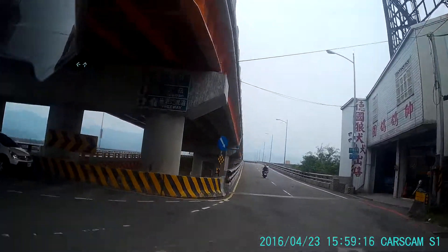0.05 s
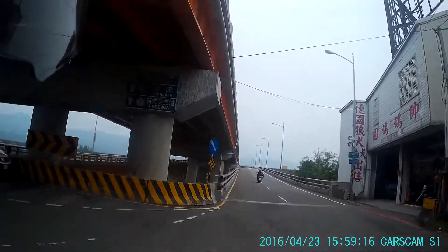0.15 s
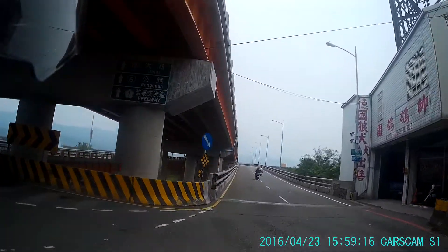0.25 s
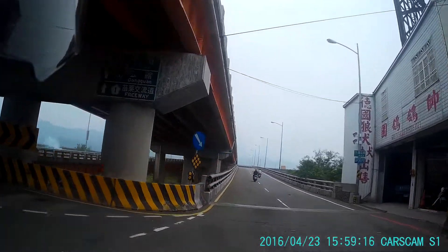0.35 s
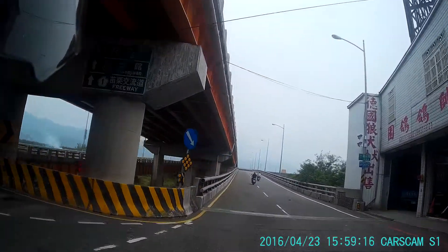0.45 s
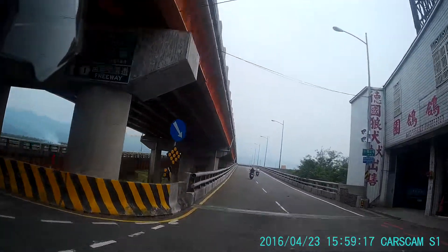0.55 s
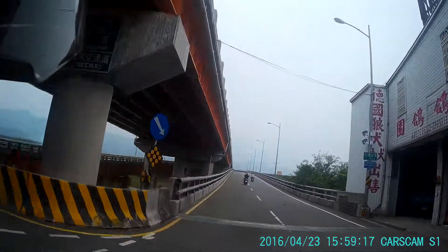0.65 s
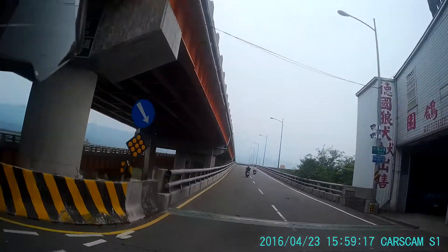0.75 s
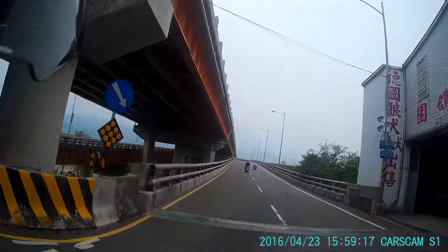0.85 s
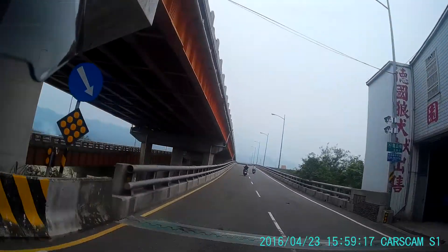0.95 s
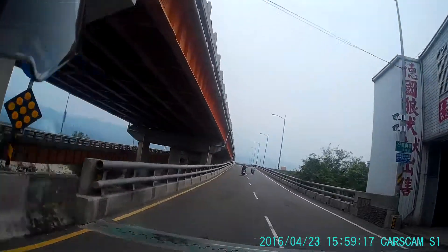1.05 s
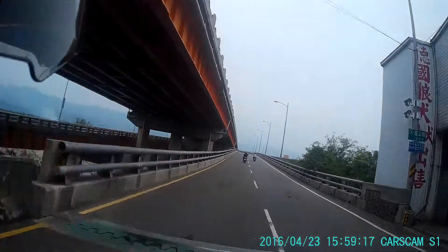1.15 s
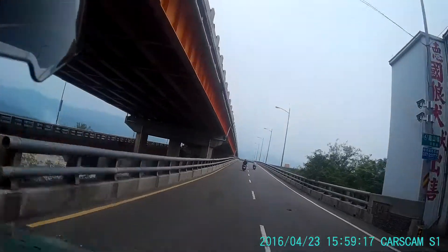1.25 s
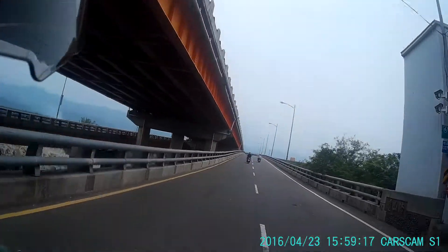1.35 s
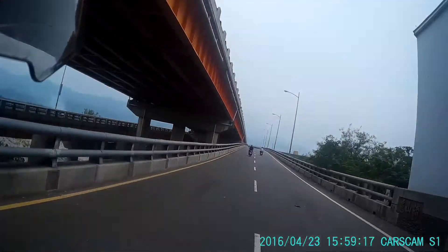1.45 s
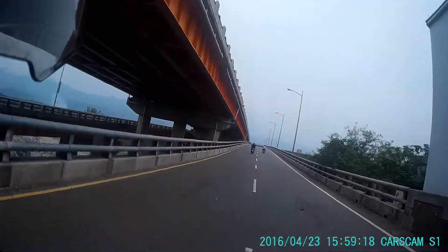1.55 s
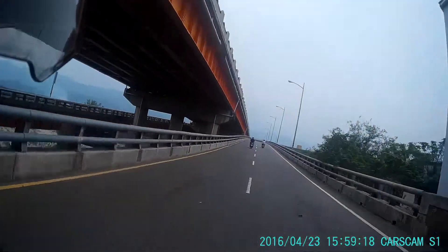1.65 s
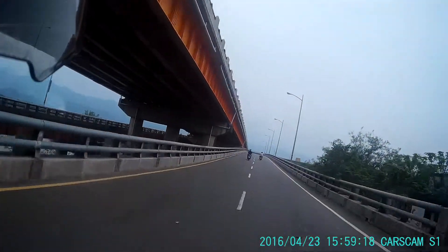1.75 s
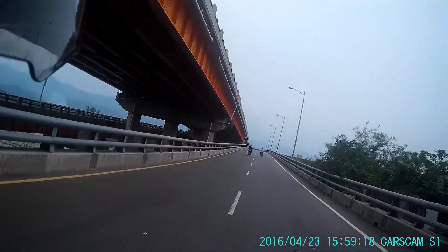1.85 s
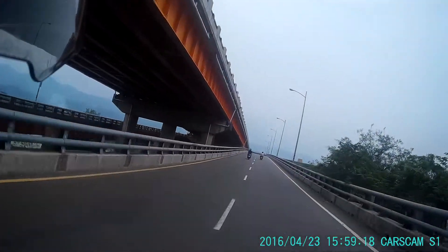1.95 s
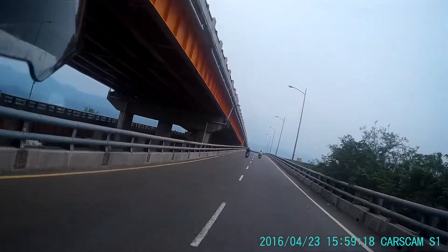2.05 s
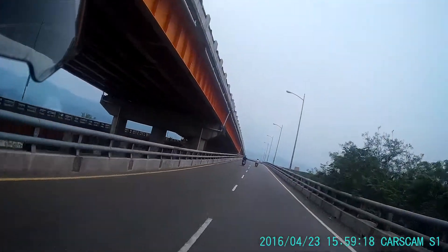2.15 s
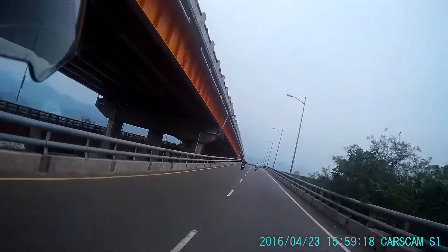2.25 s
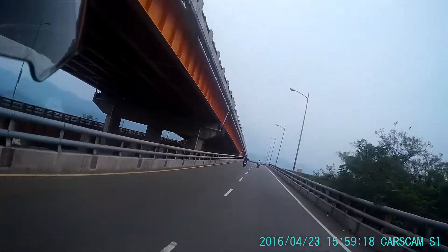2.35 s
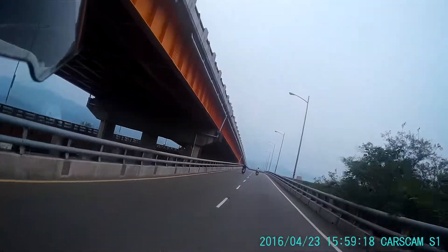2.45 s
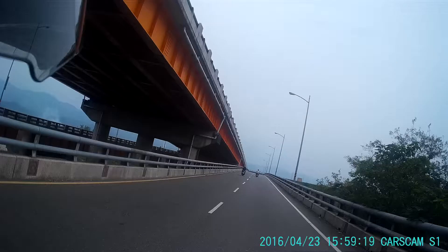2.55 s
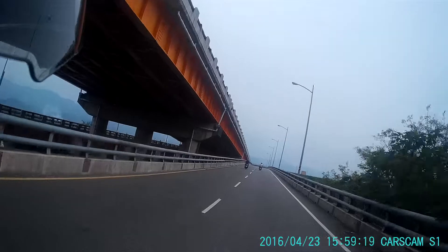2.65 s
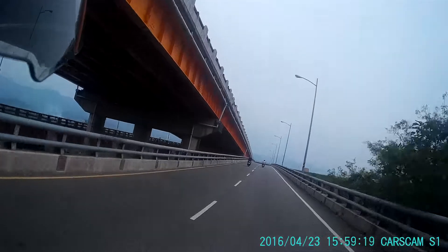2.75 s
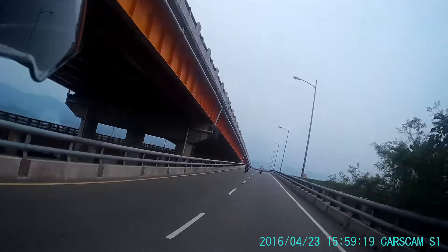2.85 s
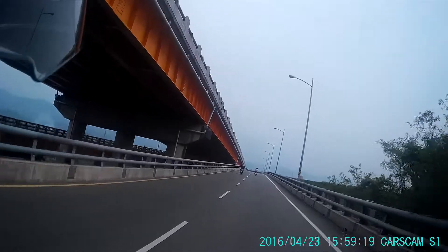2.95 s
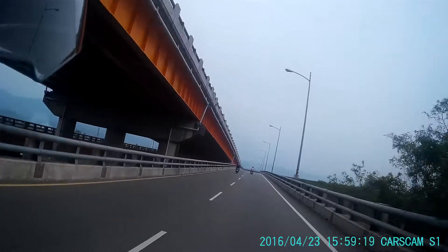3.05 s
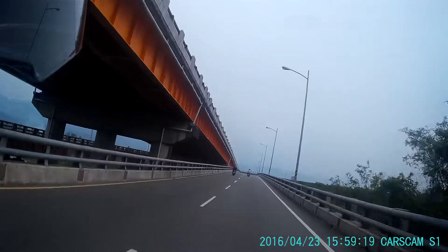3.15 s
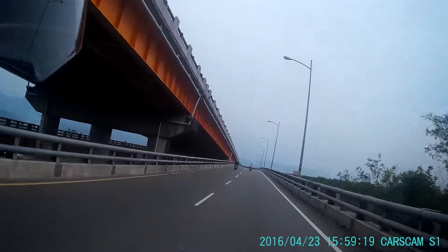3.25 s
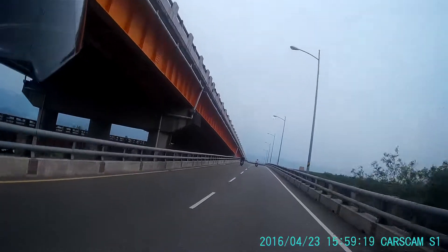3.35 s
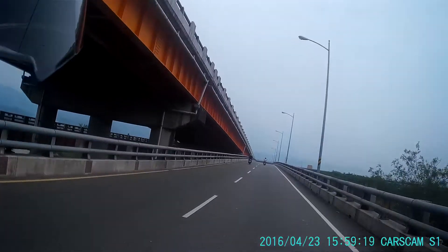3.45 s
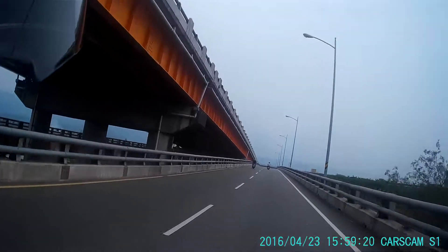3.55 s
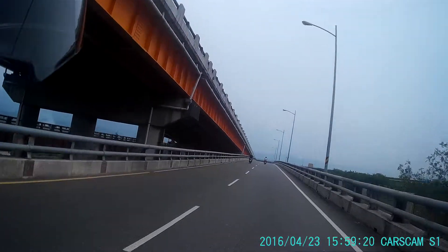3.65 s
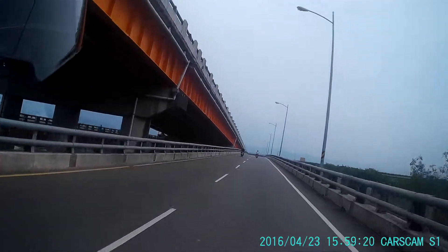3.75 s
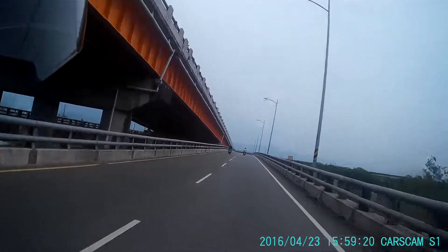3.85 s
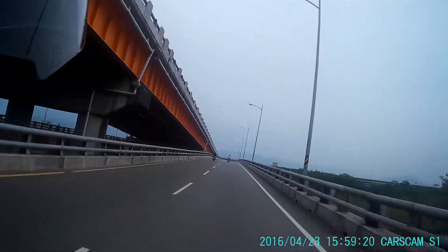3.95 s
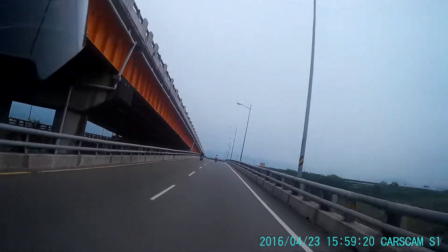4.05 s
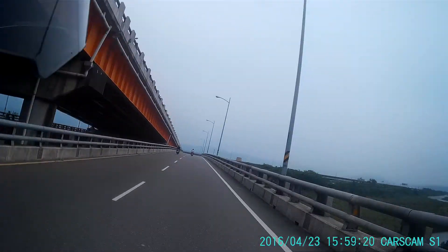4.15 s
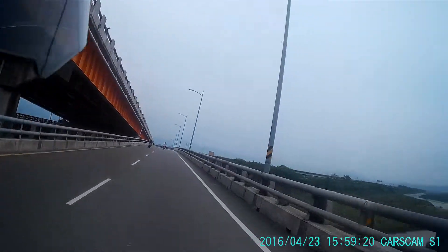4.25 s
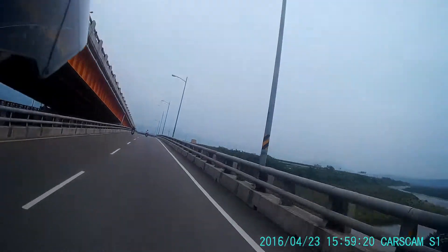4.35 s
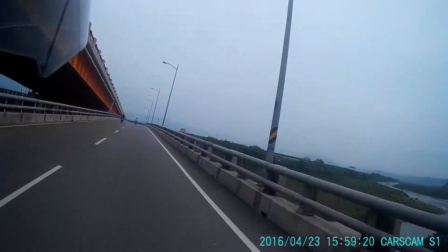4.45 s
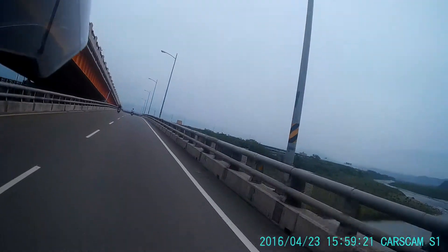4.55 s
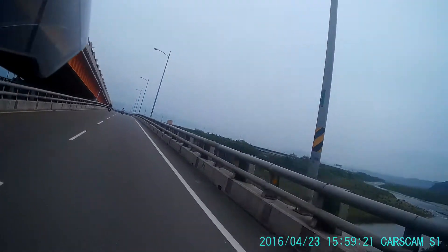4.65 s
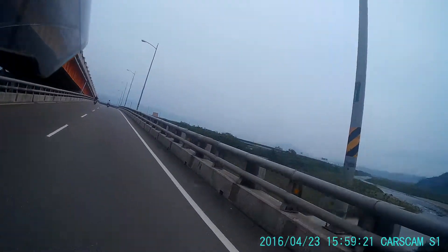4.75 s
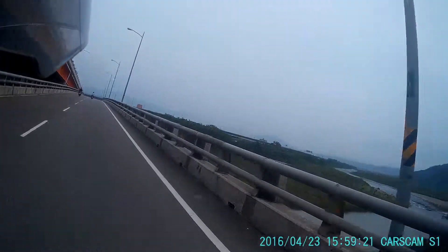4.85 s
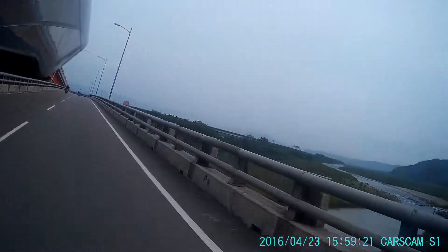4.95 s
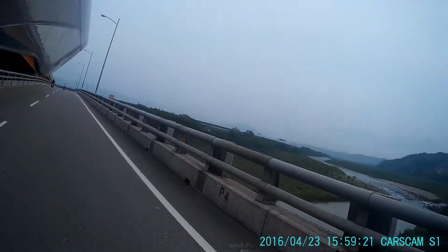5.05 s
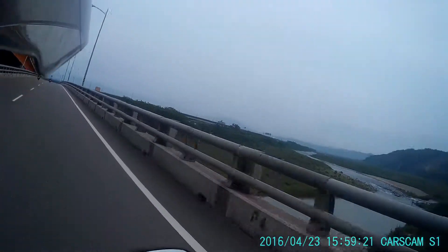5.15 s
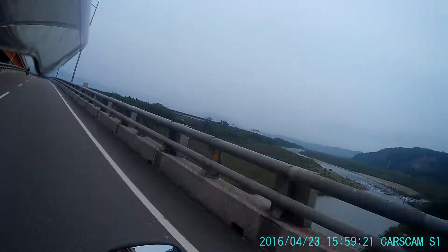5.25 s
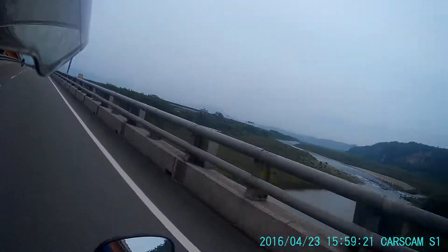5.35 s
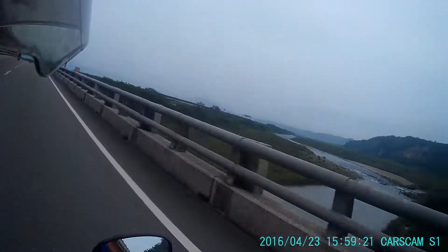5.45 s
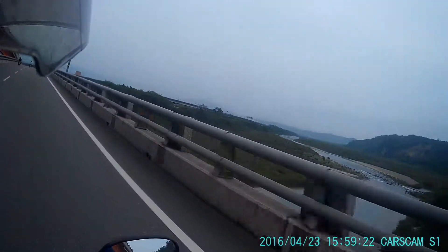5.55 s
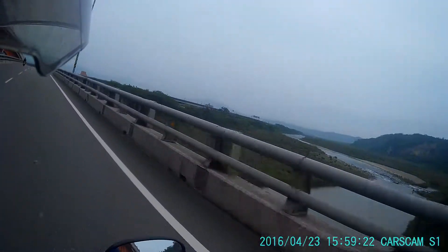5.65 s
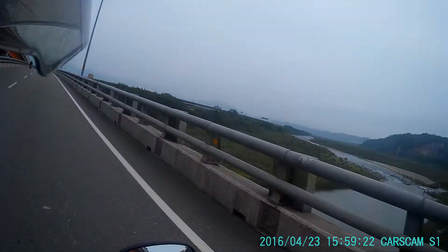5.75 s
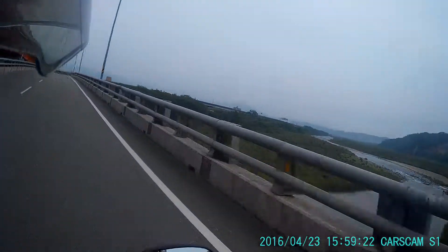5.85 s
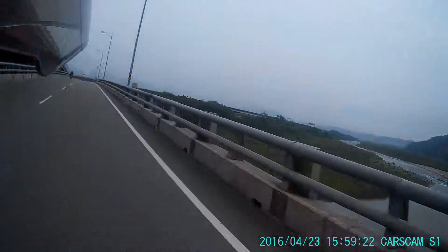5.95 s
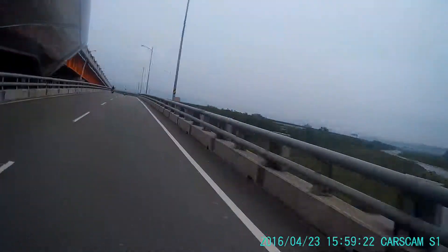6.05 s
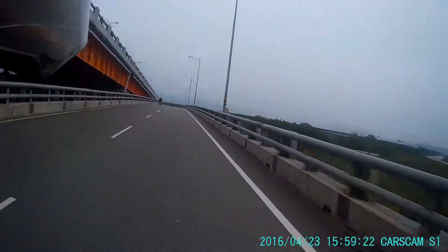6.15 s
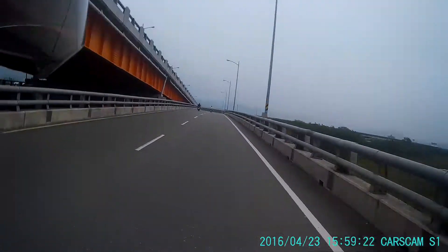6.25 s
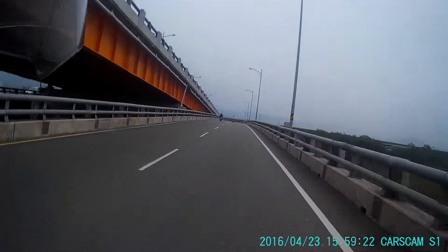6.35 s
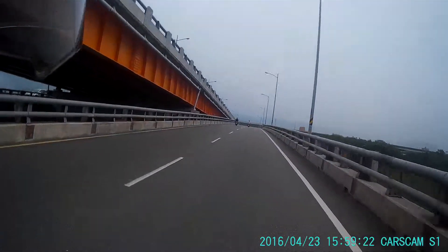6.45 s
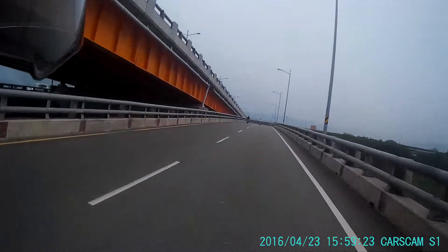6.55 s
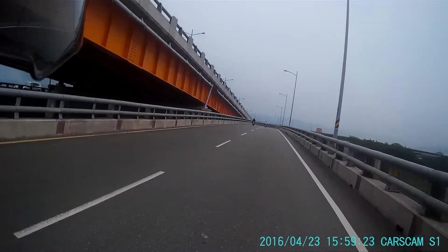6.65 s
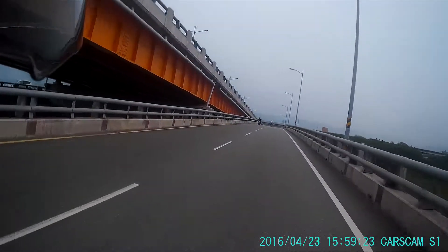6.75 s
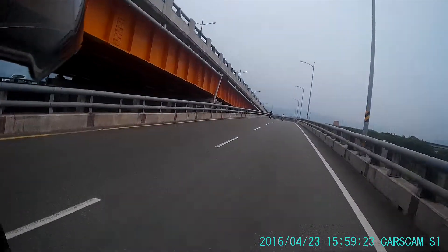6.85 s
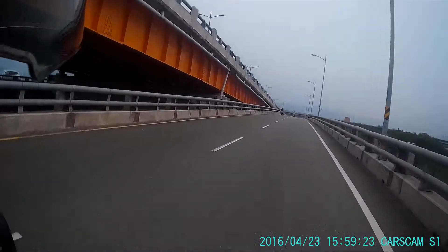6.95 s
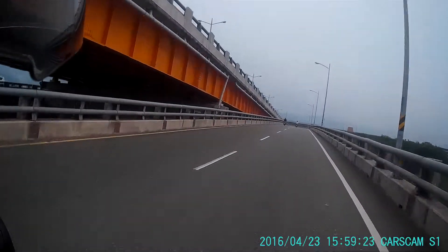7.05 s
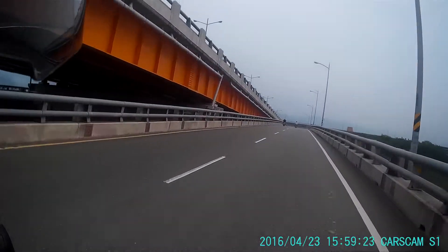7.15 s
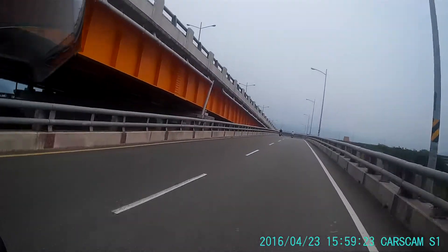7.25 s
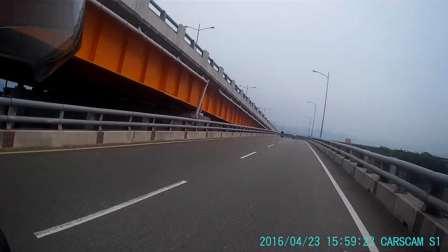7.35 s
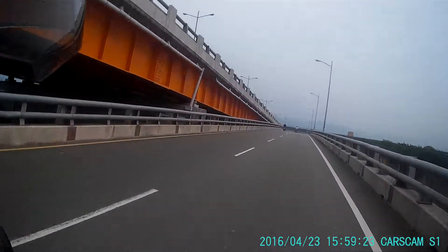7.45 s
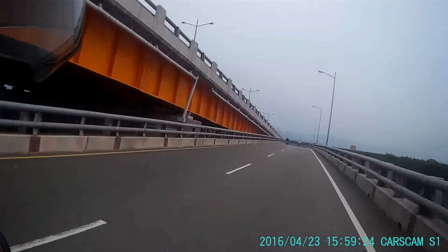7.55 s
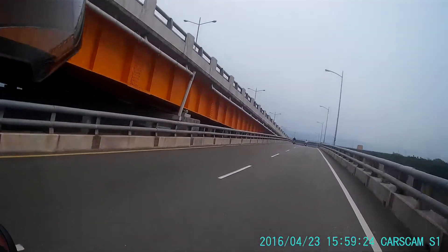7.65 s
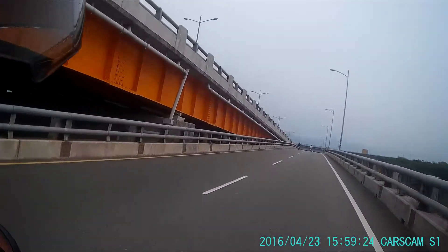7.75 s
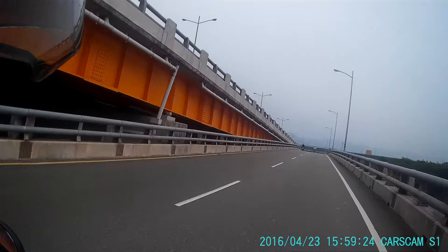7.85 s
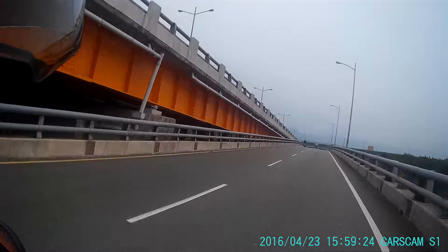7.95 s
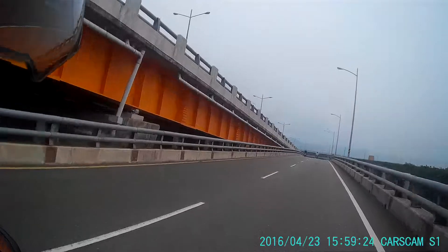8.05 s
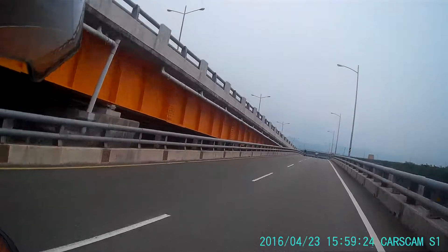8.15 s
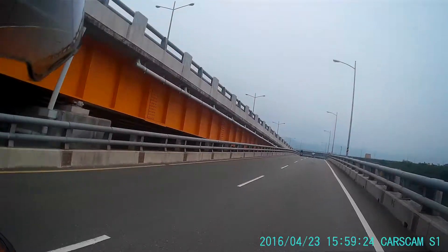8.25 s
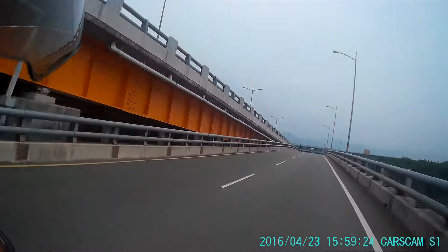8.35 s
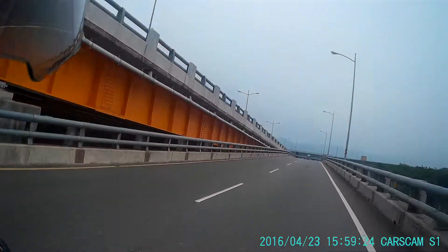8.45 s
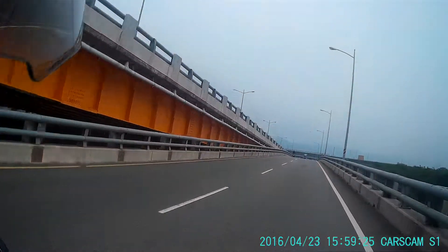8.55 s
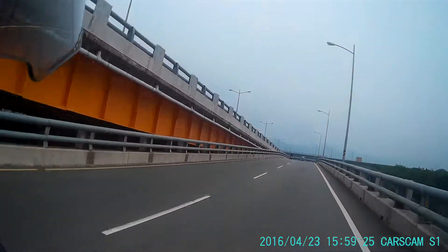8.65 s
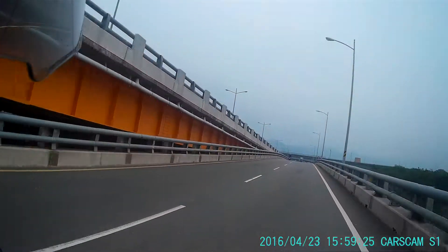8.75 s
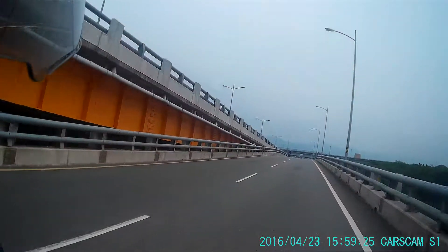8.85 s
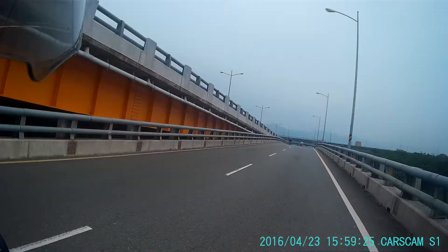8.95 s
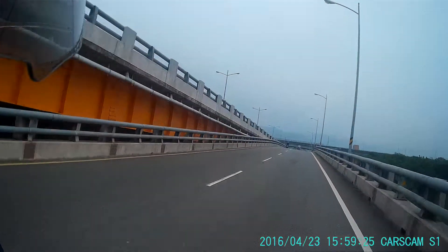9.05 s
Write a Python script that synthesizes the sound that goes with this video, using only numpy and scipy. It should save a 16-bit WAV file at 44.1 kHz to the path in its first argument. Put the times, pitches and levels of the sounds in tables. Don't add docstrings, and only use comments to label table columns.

```python
import sys
import numpy as np
from scipy import signal
from scipy.fft import rfft, irfft, next_fast_len
from scipy.io import wavfile
from scipy.ndimage import uniform_filter1d, map_coordinates

SR = 44100
rng = np.random.default_rng(int(sys.argv[2]) if len(sys.argv) > 2 else 0)


def to_linear_factor(level_db):
    exponent = np.asarray(level_db, float) / 20
    return 10 ** exponent


def unload_audio(sound):
    columns = np.transpose(np.atleast_2d(sound))
    steps = np.round(np.clip(columns, -1, 1) * 32767)
    wavfile.write(sys.argv[1], SR, steps.astype(np.int16))


N = 400869
TIME_S = np.arange(N) / SR

# f/Hz, level per Hz/dB
SIDE_AIR = [(200, -2), (280, -6), (590, -26), (1000, -5.5), (1650, -14), (1850, -14), (2350, -66),
            (3600, -34), (4900, -33), (7800, -40), (11500, -43), (15000, -35)]
HEAD_AIR = [(230, -27), (580, -25), (1250, -7), (1900, -9), (2400, -39.5), (3500, -29), (4800, -43),
            (7600, -48), (11500, -47), (15000, -48)]
# f/Hz, width/Hz, level in side wind/dB, level in head wind/dB
CAVITIES = [(385, 153, -3.5, -12), (725.6, 67.7, 3, -9.5), (872, 54, -0.5, -2), (1068, 61, -3, -0.5),
            (1358, 200, 1.5, -6), (1505, 150, -22, 3), (2060, 137, -19.5, -21.5), (2880, 550, -20.5, -29.5),
            (3590, 480, -26, -35), (4440, 390, -27, -40), (5410, 420, -29.5, -26.5),
            (6080, 360, -21.5, -25.5), (8930, 2050, -41, -32), (9900, 260, -26, -46),
            (12600, 640, -57, -35)]
SPLITS_HZ = [225, 610, 2350]
# t/s, pressure/dB, direction (0 side, 1 head), shake of the mount/dB
AIRSTREAM = [(0, -49.5, 0.43, -55.5), (1.0, -48, 0.5, -54), (1.77, -42, 0.61, -53),
             (2.28, -41, 0.59, -48.5), (2.42, -36.5, 0.53, -47), (2.85, -37.5, 0.43, -46),
             (2.97, -31.5, 0.57, -43.5), (3.86, -31, 0.54, -42.5), (4.0, -41.5, 0.13, -41.5),
             (4.45, -41.5, 0.19, -43), (4.94, -48.5, 0.15, -42.5), (5.13, -36, 0.21, -40),
             (5.65, -33.5, 0.31, -43), (6.18, -33.5, 0.35, -41), (6.28, -21.5, 0.7, -44),
             (6.9, -19.5, 0.84, -43), (8.1, -22.5, 0.81, -44.5), (9.09, -25, 0.71, -47)]
MEAN_AIR_DB, MEAN_FACING, MEAN_SHAKE_DB = -35, 0.45, -46
# middle t/s, rise/dB, half length/s
GUSTS = [(0.0, 6, 0.04), (.34, 0.5, .04), (.48, 1.5, 0.055), (.62, 0.5, 0.11), (.915, 2.1, .045),
         (1.04, 1.5, .05), (1.17, 3, .06), (1.38, 0.5, .08), (1.64, 2.5, 0.051), (1.92, 3.5, 0.13),
         (2.03, 6, 0.15), (2.47, 2, 0.058), (3.0, 2.5, 0.047), (3.24, 5.5, 0.12), (3.4, 3.5, 0.027),
         (3.67, 3.5, 0.11), (3.8, 5, .06), (4.4, 1, 0.066), (4.6, 3.5, 0.066), (5.0, 2.5, 0.038),
         (5.12, 2.5, 0.027), (5.35, 1, 0.067), (5.53, 2.5, 0.043), (5.67, 4.5, 0.11), (5.9, 0.5, .06),
         (6.45, 1.5, 0.065), (6.91, 0.5, .1), (7.86, 1, .06), (7.97, 1.5, 0.044), (8.31, 2, .06),
         (8.53, 2, 0.1), (8.92, 2.5, 0.1)]
# middle t/s, change/dB, half length/s
LULLS = [(0.17, -4, 0.045), (0.406, -1.5, 0.046), (0.556, -2.1, 0.065), (.82, -1.5, 0.061),
         (1.096, -6, 0.056), (1.31, -2.5, .06), (1.773, -3.5, 0.11), (2.22, -3, 0.12), (3.163, -6, 0.11),
         (3.554, -5, 0.043), (3.699, -2.5, 0.032), (4.234, -3, 0.085), (4.49, -4.5, 0.14),
         (4.663, -6.5, 0.1), (4.808, -4.5, 0.065), (4.942, 1, 0.026), (5.076, -5.5, 0.042), (5.15, -4, .03),
         (5.25, -3.5, 0.046), (5.456, -4.5, 0.079), (5.71, -5.5, 0.033), (5.853, -1.5, 0.05),
         (6.008, -5.5, 0.11), (7.127, -1.5, .15), (7.81, -3, 0.04), (7.926, -1.5, .05), (8.07, -2.5, 0.079),
         (8.248, -2.5, 0.085), (8.377, -5, 0.1), (8.456, -2.5, 0.068), (8.723, -2, 0.24)]
# middle t/s, extra level/dB, half length/s
RATTLES = [(2.02, 1, 0.055), (2.4, 8, 0.058), (2.6, 8, .12), (2.87, 8, 0.12), (3.03, 10.5, 0.18),
           (3.2, 11, 0.12), (3.38, 7, .1), (3.6, 8, .07), (3.72, 9.5, .06), (3.8, 9.5, .06),
           (5.3, 4, 0.084), (5.67, -2, .06), (6.23, 7.5, 0.064), (7.76, 2, 0.11), (7.92, 2, 0.054),
           (8.16, 3, .06), (8.4, 4, .05), (8.53, 3.5, .08)]
# middle t/s, extra level/dB, half length/s
JOLTS = [(.14, -2.1, .15), (.59, 0, .1), (.91, 2.1, 0.093), (1.38, 1, .12), (1.52, -2, 0.088),
         (1.61, 3, .1), (3.22, 2, .1), (3.72, -2, 0.076), (3.9, 4.5, 0.085), (4.8, -8, 0.091),
         (4.93, -5, .07), (5.35, 1.5, 0.13), (5.69, 7, 0.17), (6.08, -0.5, .08), (6.49, 4, 0.13),
         (7.6, 3, 0.14), (7.75, -1.5, .12), (8.0, 0, 0.093), (8.3, -3.5, 0.09), (8.56, 3, 0.097),
         (8.8, -3, 0.11)]
# middle t/s, extra level/dB, half length/s
SPRAYS = [(.1, 1.5, .2), (1.5, -2, 0.33), (2.03, 1.5, .12), (2.75, 0.5, .12), (3.3, 1.5, .12),
          (4.1, 3, .13), (4.35, -2.5, 0.18), (5.2, -0.5, .08), (5.52, -3.5, 0.11), (5.9, 1.5, 0.13),
          (6.1, 1, 0.087), (6.32, -2.5, 0.18), (6.9, 0.5, .12), (8.0, 3, 0.11), (8.2, 1.5, .08),
          (8.7, 0, 0.078)]
# mean level/dB, then dB per dB of pressure, dB per dB of gust,
# dB per full turn into the wind, dB per dB of shake
HISS_LAW = (-55, 0.86, 0.53, -4, 0.2)
BUZZ_LAW = (-64.5, 1.1644, 1, 6.5, -0.1)
BOOM_LAW = (-43, 0.4559, .5, -5, 0.89)
PORT_LAW = (-69, 0.73, 0.2, 4, -0.5)
# f/Hz, width/Hz, level/dB
SHELL = [(6670, 640, 3), (7290, 210, -9)]
# t/s, f/Hz, level/dB
LOW_WHISTLE = [(2.38, 2780, -69), (2.48, 2720, -66), (2.66, 2820, -62), (2.84, 2720, -66),
               (2.99, 2870, -59), (3.05, 2850, -55), (3.15, 2880, -64), (3.27, 2790, -55),
               (3.36, 2755, -62), (3.42, 2770, -59), (3.55, 2880, -61), (3.67, 2815, -53.5),
               (3.73, 2830, -62), (3.84, 2960, -59), (3.95, 2880, -59), (4.08, 2800, -67),
               (4.22, 2840, -71), (4.45, 2700, -70)]
HIGH_WHISTLE = [(6.75, 8300, -60), (7.02, 8150, -60), (7.45, 7980, -61), (7.9, 8190, -57),
                (7.95, 7400, -53), (8.0, 7450, -47), (8.1, 7390, -55), (8.42, 7800, -68), (8.55, 7750, -63),
                (8.92, 7620, -68)]
# middle t/s, rise/Hz, half length/s
LOW_FLIPS = [(2.9, 350, 0.065), (3.22, 272, 0.055), (3.497, 100.6, .07), (3.615, 369, 0.051)]
HIGH_FLIPS = [(7.099, 153, .06), (7.84, 150, .08), (8.53, 428, 0.087), (8.71, 503, .07)]
# middle t/s, half length/s, start f/Hz, end f/Hz, level/dB
CHIRPS = [(7.752, .02, 7250, 7270, -52), (7.975, .035, 7380, 7600, -52), (8.03, .04, 7450, 7350, -53),
          (8.285, 0.054, 7760, 7900, -58), (8.54, .035, 8300, 8150, -55), (8.585, .025, 8150, 8000, -58),
          (8.63, 0.0347, 7850, 7700, -60), (8.71, .04, 8050, 8350, -56), (8.78, .03, 7750, 7700, -60),
          (8.915, 0.019, 8400, 8200, -53)]
# f/Hz, level per Hz/dB
RUMBLE = [(12, -23), (22, 2.5), (55, 0), (82, -1.5), (120, 3), (160, -2), (200, 0), (235, -16.5),
          (300, -41.5)]
# t/s, peak level/dB, f/Hz
BUMPS = [
    (.5, -51, 18),
    (1.29, -44, 21),
    (5.33, -36, 210),
    (5.555, -35, 100),
    (5.61, -42, 52),
    (5.667, -35, 119),
    (5.74, -39, 275),
    (6.009, -36, 164),
]
# t/s, peak level/dB
TICKS = [(2.022, -42), (2.973, -48), (2.9899, -48), (3.0294, -42), (3.1695, -48), (3.211, -48),
         (3.3057, -40), (3.3292, -42), (3.3466, -44), (3.3875, -41), (3.4379, -45), (3.5804, -44),
         (3.626, -41), (3.6914, -49), (3.7682, -40), (3.8001, -43), (3.9647, -46), (5.1106, -50),
         (5.2623, -50), (5.2762, -43), (5.3057, -46), (5.3456, -42), (5.3955, -47), (5.607, -45),
         (5.6743, -47), (5.7716, -45)]
# t/s, firing f/Hz, first order level/dB, second order level/dB
ENGINE = [(0, 56, -68, -65), (2.3, 48.75, -56.5, -65), (3.3, 55.9, -63, -51.5), (4, 59.54, -71, -63),
          (5.2, 48.1, -46.5, -60), (5.62, 58.3, -48, -60), (5.68, 60, -44, -46), (5.76, 59.2, -45, -43),
          (5.83, 58.9, -48, -36), (5.92, 57.3, -45, -39.5), (5.97, 57.3, -52, -60), (7, 59.7, -62, -57),
          (7.6, 59.7, -60, -57), (8.3, 61.3, -53, -54), (9.1, 64, -59, -55)]
# start t/s, end t/s, level/dB
STORING = [
    (1.83, 2.39, -77.5),
    (2.66, 3.42, -76.5),
    (3.68, 3.93, -79),
    (8.83, 9.2, -71),
]
# f/Hz, width/Hz, level/dB
STORING_BANDS = [(15000, 750, 8), (10560, 380, 6)]
# f/Hz, level/dB
EDGE = [(14900, 0), (15250, -2), (15740, -8), (15800, -50)]


def read(points, hz):
    f, value = np.transpose(points)
    return np.interp(np.log(hz + 1), np.log(f + 1), value)


def curve(rows):
    s, *columns = np.transpose(np.vstack(rows))
    return [np.interp(TIME_S, s, column) for column in columns]


def swells(rows):
    return sum(height * np.cos(np.pi / 2 * np.clip((TIME_S - s) / half, -1, 1)) ** 2
               for s, height, half in rows)


def gusting():
    return swells(GUSTS + LULLS)


def follow(law):
    mean_db, per_air, per_gust, per_turn, per_shake = law
    air_db, facing, shake_db = curve(AIRSTREAM)
    steady_db = mean_db + per_air * (air_db - MEAN_AIR_DB) + per_gust * gusting()
    return steady_db + per_turn * (facing - MEAN_FACING) + per_shake * (shake_db - MEAN_SHAKE_DB)


def gate(start, end, fade):
    return np.clip(np.minimum(TIME_S - start, end - TIME_S) / fade, 0, 1)


def evened(x):
    return x / np.sqrt(np.mean(x ** 2) + 1e-20)


def filtered(x, gain):
    size = next_fast_len(N)
    return irfft(rfft(x, size) * gain(np.fft.rfftfreq(size, 1 / SR)), size)[..., :N]


def drift(low_hz, high_hz):
    def slow_part(hz):
        return (hz > low_hz) / np.sqrt(hz + 1) / (1 + (hz / high_hz) ** 2)
    return evened(filtered(rng.standard_normal(N), slow_part))


def fuzzy(hz, width_hz, steady=0):
    r = np.exp(-np.pi * width_hz / SR)
    z = rng.standard_normal(N) + 1j * rng.standard_normal(N)
    for _ in range(2):
        z = signal.lfilter([1], [1, -r], z)
    z = z + steady * np.sqrt(np.mean(np.abs(z) ** 2))
    turn = 2 * np.pi * np.cumsum(hz * np.ones(N)) / SR
    return evened((z * np.exp(1j * turn)).real)


def wind():
    hop, window = 256, 1024
    frames, hz = N // hop + 5, np.fft.rfftfreq(window, 1 / SR)
    frame_s = np.arange(frames) * hop / SR
    air_db, facing, _ = curve(AIRSTREAM)
    gust_db = gusting()
    roar_db = air_db + gust_db
    hiss_db = follow(HISS_LAW) + swells(SPRAYS)
    buzz_db = follow(BUZZ_LAW) + swells(RATTLES)
    boom_db = follow(BOOM_LAW) + 0.42 * swells(JOLTS)
    eddies, surges, crackle = drift(5.8, 130), drift(4.6, 27), drift(12, 300)

    head = np.clip(np.interp(frame_s, TIME_S, facing), -0.2, 1.2)
    side_db, head_db = housing(hz, SIDE_AIR, column=2), housing(hz, HEAD_AIR, column=3)
    colour = to_linear_factor(np.outer(side_db, 1 - head) + np.outer(head_db, head))

    pitch = 1 + 0.012 * uniform_filter1d(surges, size=2000) + 0.002 * gust_db
    sway = np.interp(frame_s, TIME_S, pitch)
    bins, steps = np.indices(colour.shape)
    colour = map_coordinates(colour, [bins / sway, steps], order=1, mode="nearest")

    fine_db = 1.0 * drift(3.0, 30) + 0.25 * uniform_filter1d(buzz_db - hiss_db + 7.5, size=8000)
    fine_db += 0.4 * swells(SPRAYS) + 1.5 * (facing - MEAN_FACING)
    flutter_db = np.outer(np.clip(hz / 7000 - 0.6, 0, 1), np.interp(frame_s, TIME_S, fine_db))

    a, b, patches = rng.standard_normal((frames, len(hz), 3)).T
    for axis in (0, 1):
        patches = uniform_filter1d(patches, size=12, axis=axis)
    texture = to_linear_factor(0.52 * evened(patches) + flutter_db)

    above = [1 / (1 + (edge / (hz + 1)) ** 12) for edge in SPLITS_HZ]
    layers = [
        (above[1] - above[2], roar_db, 0.37 * eddies + 0.41 * surges),
        (above[0] - above[1], boom_db, 0.45 * eddies + 0.28 * surges),
        (above[2], hiss_db + 1.5, 0.91 * eddies + 0.13 * surges)]
    out = shell_buzz(buzz_db, crackle, eddies)
    for share, level_db, flicker_db in layers:
        gain = colour * np.sqrt(np.clip(share, 0, 1))[:, None]
        gain = gain / np.linalg.norm(gain, axis=0) * texture
        noise = signal.istft((a + 1j * b) * gain, nperseg=window, noverlap=window - hop)[1][:N]
        out += to_linear_factor(level_db) * evened(noise * to_linear_factor(flicker_db))
    return out


def housing(hz, air, column):
    power = to_linear_factor(read(air, hz)) ** 2
    for row in CAVITIES:
        distance = (hz - row[0]) / (0.72 * row[1])
        power = power + to_linear_factor(row[column]) ** 2 / (1 + distance ** 2) ** 2
    return 10 * np.log10(power)


def shell_buzz(level_db, crackle, eddies):
    ring = sum(to_linear_factor(db) * fuzzy(f, width) for f, width, db in SHELL)
    return to_linear_factor(level_db - 0.5) * evened(ring * to_linear_factor(0.94 * crackle + 0.5 * eddies))


def rumble():
    shake_db = curve(AIRSTREAM)[2] - 1.14 + swells(JOLTS) + 0.28 * gusting()
    noise = filtered(rng.standard_normal(N), lambda hz: to_linear_factor(read(RUMBLE, hz)))
    out = to_linear_factor(shake_db) * evened(noise)
    for s, db, hz in BUMPS:
        thud = np.exp(-((TIME_S - s - 0.04) / 0.032) ** 2)
        out += to_linear_factor(db) * thud * np.sin(2 * np.pi * hz * (TIME_S - s))
    return out


def whistle(rows, flips, lift_db, width_hz, steady):
    hz, db = curve(rows)
    pitch_hz = (hz + swells(flips)) * (1 + 0.005 * drift(4.3, 33))
    tone = fuzzy(pitch_hz, width_hz, steady)
    sputter_db = 1.5 * drift(6.5, 30)
    return to_linear_factor(db + lift_db + sputter_db) * gate(rows[0][0], rows[-1][0], 0.16) * tone


def chirps():
    mid, half, start_hz, end_hz, _ = np.transpose(CHIRPS)
    glide_s = np.ravel([mid - half, mid + half], "F")
    hz = np.interp(TIME_S, glide_s, np.ravel([start_hz, end_hz], "F"))
    opening = swells([(s, to_linear_factor(db), reach) for s, reach, _, _, db in CHIRPS])
    return opening * fuzzy(hz, width_hz=200, steady=0.8)


def ticks():
    length = 900
    out, t = np.zeros(N + length), np.arange(length) / SR
    noise = rng.standard_normal((len(TICKS), length))
    for (s, db), grain in zip(TICKS, noise):
        fade = to_linear_factor(db + 7.0 - 60 * t / 0.034)
        out[round(s * SR):][:length] += fade * grain * np.minimum(t / 0.0014, 1)
    snap_band = signal.butter(3, [6100, 9000], "band", fs=SR, output="sos")
    ring_band = signal.butter(2, [5900, 7200], "band", fs=SR, output="sos")
    return 0.5 * signal.sosfilt(snap_band, out[:N]) + 1.55 * signal.sosfilt(ring_band, out[:N])


def port():
    lift_db = sum(2 * gate(start, end, 0.07) for start, end, _ in STORING)
    level_db = follow(PORT_LAW) + lift_db + 1.1 * swells(SPRAYS)
    return to_linear_factor(level_db) * fuzzy(9940, width_hz=300)


def wall_hiss():
    away_s = np.abs(TIME_S - 0.25)
    return to_linear_factor(-66 - 18 * away_s) * fuzzy(9800, width_hz=550)


def engine():
    hz, first_db, second_db = curve(ENGINE)
    turn = 2 * np.pi * np.cumsum(hz * (1 + 0.032 * drift(2.2, 16))) / SR
    upper = np.sin(2 * turn) + to_linear_factor(-16.5) * np.sin(3 * turn)
    orders = to_linear_factor(first_db) * np.sin(turn) + to_linear_factor(second_db) * upper
    return 1.46 * orders * to_linear_factor(2.2 * drift(4.2, 21))


def electronics():
    hiss = to_linear_factor(-66.5) * rng.standard_normal(N)
    bursts = sum(to_linear_factor(db) * gate(start, end, 0.13) for start, end, db in STORING)
    leak = sum(to_linear_factor(db) * fuzzy(hz, width) for hz, width, db in STORING_BANDS)
    on = np.clip((0.13 - abs((TIME_S - 0.3) % 1 - 0.5)) / 0.01, 0, 1)
    whine_db = -83 + 0.3 * (curve(AIRSTREAM)[0] - MEAN_AIR_DB) + 3
    whine = to_linear_factor(whine_db) * on * np.sin(2 * np.pi * 14830 * TIME_S)
    return hiss + bursts * leak * to_linear_factor(0.6 * gusting()) + whine


def scene():
    low = whistle(LOW_WHISTLE, LOW_FLIPS, lift_db=1.5, width_hz=60, steady=1.6)
    high = whistle(HIGH_WHISTLE, HIGH_FLIPS, lift_db=-1, width_hz=300, steady=0)
    air = wind() + low + high + chirps() + port() + wall_hiss()
    return (air + rumble() + ticks() + engine())[None]


def low_pass(x):
    return signal.sosfilt(signal.butter(12, 15830, fs=SR, output="sos"), x)


def record(dry):
    mix = filtered(dry + electronics(), lambda hz: to_linear_factor(read(EDGE, hz)))
    return low_pass(mix)


dry = scene()
out = record(dry)
unload_audio(out)
```